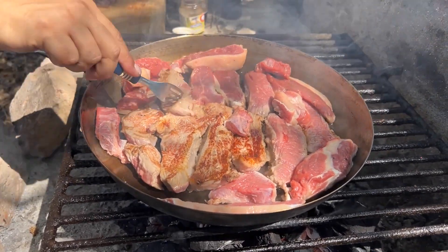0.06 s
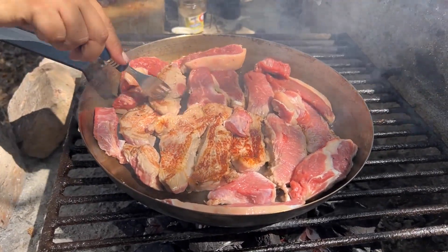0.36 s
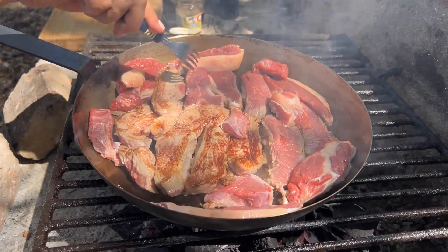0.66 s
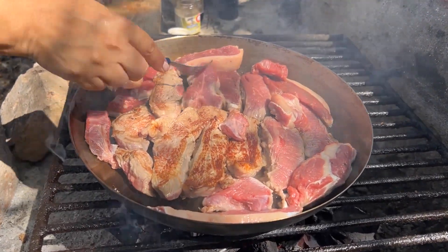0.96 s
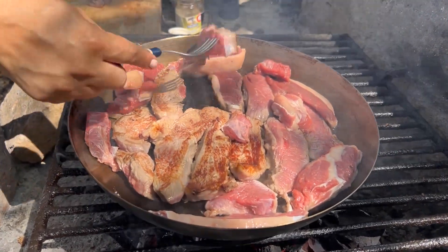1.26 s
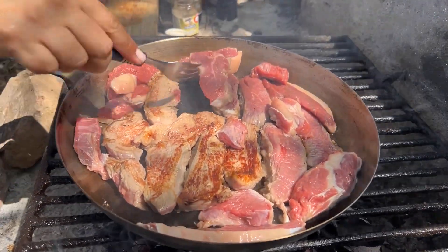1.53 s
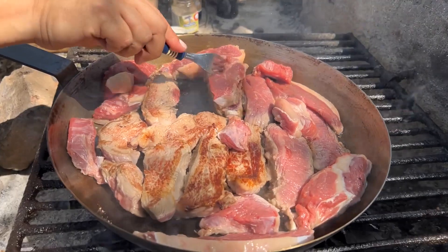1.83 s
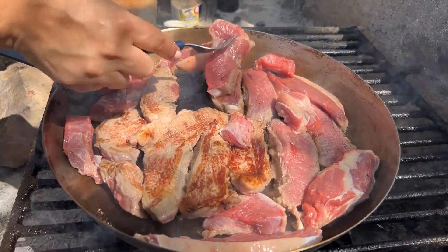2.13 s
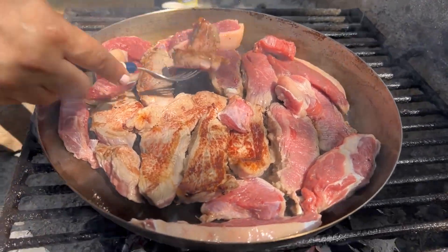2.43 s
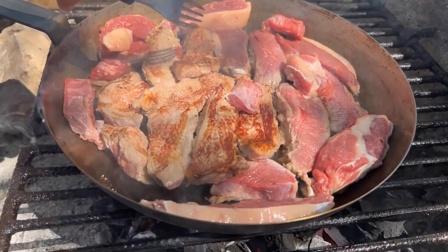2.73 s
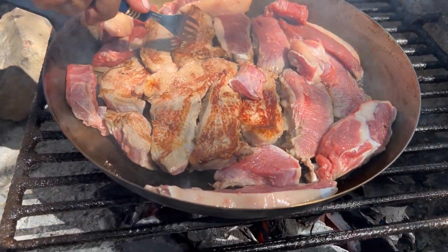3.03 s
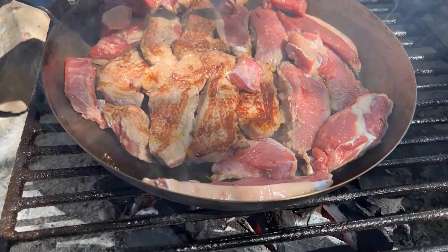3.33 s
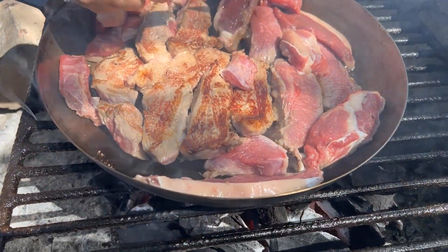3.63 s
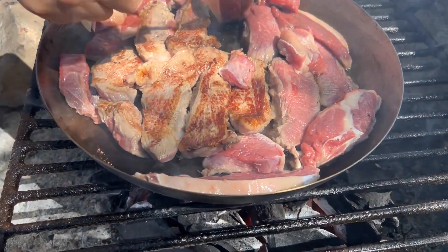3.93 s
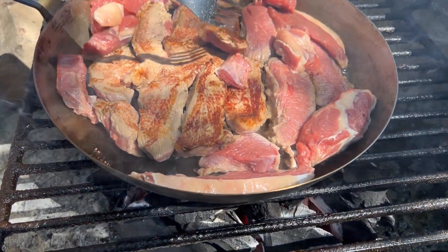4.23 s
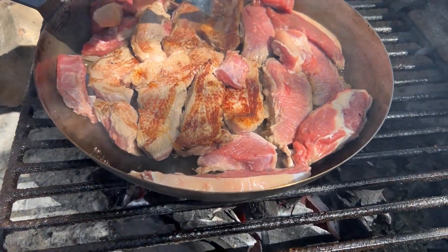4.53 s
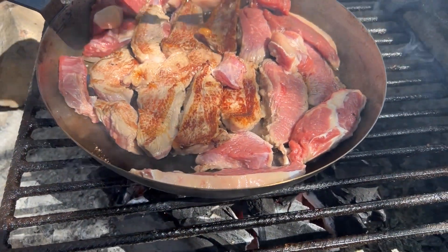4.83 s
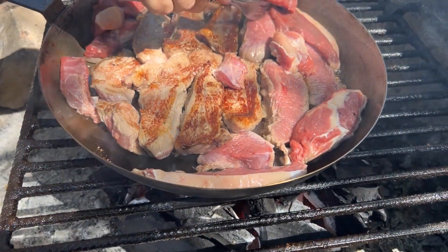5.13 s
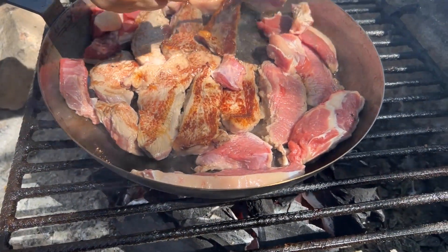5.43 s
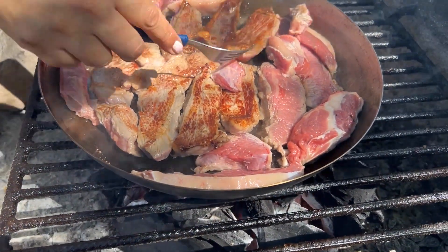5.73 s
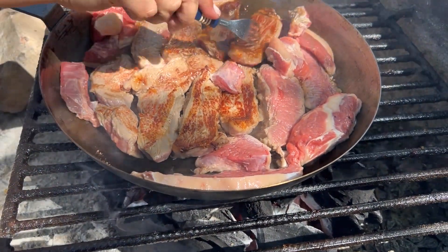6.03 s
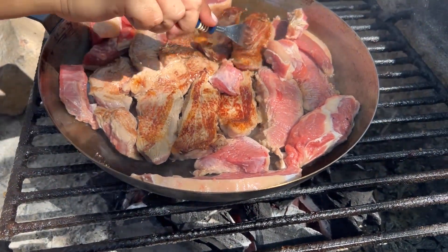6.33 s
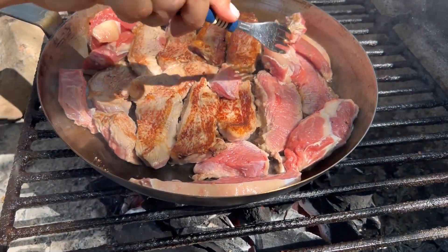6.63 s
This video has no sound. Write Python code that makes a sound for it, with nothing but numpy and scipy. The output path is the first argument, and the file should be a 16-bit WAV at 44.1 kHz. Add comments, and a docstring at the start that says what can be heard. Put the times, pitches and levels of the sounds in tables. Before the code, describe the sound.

Heard close up and in stereo, meat sizzles in an oiled metal pan in the open air. The fine fizz and bubbling stay steady from start to finish, while single pops and spits of fat stand out. Now and then the frying flares a little and juice gurgles as pieces are turned and laid down softly. Later a faint low rumble of wind touches the microphones.

```python
"""Thin pieces of meat sizzle in hot oil in a metal pan over charcoal, outdoors, while a fork turns them.
Countless steam bubbles burst, the smaller the higher: large in the juice, smaller in the oil, a fine fizz
under the meat. Single pops, spits, gurgles and ticks stand out as damped oscillations; meat lands softly.
Later a hand forms a resonant hollow over the pan. A light breeze buffets the close pair of microphones."""
import sys
import numpy as np
from scipy import signal
from scipy.fft import rfft, irfft, next_fast_len
from scipy.io import wavfile
from scipy.ndimage import map_coordinates

SR = 44100
rng = np.random.default_rng(int(sys.argv[2]) if len(sys.argv) > 2 else 0)


def dump(signal):
    """Clip the signal to [-1, 1] and save it as 16-bit WAV at the path in sys.argv[1]."""
    limited = np.clip(np.atleast_2d(signal).T, -1, 1)
    pcm = np.round(limited * 32767).astype(np.int16)
    wavfile.write(sys.argv[1], SR, pcm)


N = 294588
FFT_SIZE = next_fast_len(N + 4096)
HZ, TIME = np.fft.rfftfreq(FFT_SIZE, 1 / SR), np.arange(N) / SR
SIDES = np.array([[1], [-1]])  # left, right

# spectra of large, smaller and finest bubbles: (f/Hz, relative level/dB)
JUICE_SPECTRUM = [(300, -34), (410, -21), (520, -10), (660, -6), (930, -7.5), (1250, -4), (1750, 0.5),
                  (2800, -17), (5000, -25)]
OIL_SPECTRUM = [(700, -32.5), (1500, -13), (2100, -1.5), (2700, 1), (4300, -1.5), (5300, -5), (7000, -10.5),
                (12000, -35)]
FIZZ_SPECTRUM = [(2000, -36.5), (4500, -7), (6200, -3), (7100, -1), (8400, 0.5), (11200, -2.5), (14300, -8),
                 (16000, -9.5)]
# how hard the whole pan fries: (t/s, gain/dB)
HEAT = [(0, -1.5), (.6, -.5), (1.6, 1.5), (2.5, 1.24), (4.3, 0), (5.3, 1.1), (6.68, -1)]
# the fork presses or lays meat on hot metal: (t/s, duration/s, oil gain/dB, fizz gain/dB)
FLARES = [(0.252, 0.092, -1.5, 3), (1.935, .28, 1.8, 0.3), (2.7, .03, 4.5, 3.5), (2.98, 0.21, 2.5, 2.2),
          (3.38, .26, .8, 1.5), (3.728, .23, 1.2, 1.5), (3.994, .11, 1, 4), (4.46, .17, 1, 2),
          (4.722, 0.25, -0.5, 1.5), (4.974, 0.16, 0.5, 3), (5.415, .38, 0, 3), (5.55, .044, 0, 5),
          (5.98, .08, 2.3, 3.5), (6.45, 0.13, 0.3, 1.5)]
# a piece is off the metal: (t/s, duration/s, gain/dB)
LULLS = [(.03, 0.17, -1), (2.838, 0.084, -2), (3.93, 0.079, -1.5), (4.234, 0.27, -1), (6.094, 0.046, -2.5)]
# large steam bubbles: (t/s, level/dB, f/Hz, envelope half-width/cycles)
POPS = [(0.1496, -19.5, 1960, 1.25), (.389, -19, 1900, .6), (.5563, -13, 2600, 0.44),
        (0.5753, -8, 4000, 0.49), (.822, -13.5, 2450, .55), (.8788, -6.2, 2500, 0.51),
        (.8857, -15, 2000, 1.1), (1.2302, -6.5, 3700, 0.37), (1.2376, -9, 3150, 0.65),
        (1.2548, -9.5, 2100, 0.38), (1.3375, -14, 3300, 0.73), (1.4157, -12, 1900, .4),
        (1.5045, -14, 2900, 0.71), (2.144, -11.5, 2090, .8), (2.206, -11, 2350, 0.65),
        (2.228, -11, 2900, .5), (2.293, -4.5, 3400, 0.56), (2.319, -7.5, 3100, 0.42),
        (2.3651, -8.5, 2300, 0.37), (3.0147, -10.5, 2350, .56), (3.1418, -14, 2700, 0.3),
        (3.2224, -3.7, 2510, 0.56), (3.43, -14, 2800, 1.2), (3.5547, -13, 3010, .44),
        (3.9001, -18.5, 1400, 0.66), (3.9282, -8, 2800, .6), (4.1143, -9.5, 2500, 0.4),
        (4.4331, -11, 1940, .9), (4.9891, -10, 3300, .43), (5.0273, -7, 3700, .5), (5.045, -11, 3200, 0.4),
        (5.135, -9, 3000, .65), (5.476, -11, 3100, .55), (6.1696, -8, 3900, 0.51), (6.487, -18, 1910, 0.64),
        (6.6312, -16.5, 2500, 0.6)]
# spits of fat: (t/s, level/dB)
SPITS = [(1.2302, -7), (1.9702, -15), (2.2068, -5), (2.2319, -7), (2.3186, -4.5), (2.4163, -10),
         (3.076, -5), (3.0909, -10), (3.4116, -3), (4.835, -10), (6.4061, -3)]
# juice escapes under a pressed piece: (t/s, duration/s, bubble level/dB, f/Hz, scatter/octaves)
GURGLES = [(1.018, 0.39, -21.5, 2680, 0.28), (1.901, .4, -18.5, 2560, 0.26), (3.009, .13, -17, 2380, .34),
           (3.642, .024, -18, 1530, .1), (3.667, .085, -24.5, 1480, .1), (5.319, .07, -24.5, 1350, .2)]
# meat and fork land on the pan: (t/s, level/dB, f/Hz)
THUDS = [(1.371, -45, 150), (1.776, -42, 166), (2.422, -40, 80), (3.458, -41, 159), (6.565, -45, 170)]
# puffs of breeze: (t/s, duration/s, level/dB)
PUFFS = [(3.683, .42, -56), (4.564, 0.11, -45.5), (4.68, .07, -48), (5.18, .13, -44), (5.286, 0.23, -47.5),
         (5.57, .12, -43.5), (5.907, 0.062, -49), (5.697, 1.3, -51)]
# spectra of the puffs and of the steady outdoor air: (f/Hz, relative level/dB)
PUFF_SPECTRUM = [(18, -30), (45, -2.5), (58, 1), (80, -4.5), (200, -29), (500, -70)]
AIR_SPECTRUM = [(25, -19), (60, -2.5), (110, -4.5), (180, -1), (280, -3), (385, -9.5), (3000, -47)]
# hand and lifted piece form a hollow over the pan: (t/s, share of the sound passing through it)
HAND_COVER = [(5.25, 0.58), (5.9, 0.55)]
# response of that hollow: (f/Hz, gain/dB)
HOLLOW_RESPONSE = [(900, 0), (1300, -2), (1800, -0.5), (2200, -1.5), (2500, -0.5), (3400, 0.5), (4250, 3.5),
                   (5300, -2), (6300, 3), (7050, -2.5), (7800, 1.5), (8600, 2.5), (9400, -9.5), (11500, -2)]
# likeness of the sizzle at the two microphones: (f/Hz, coherence)
COHERENCE = [(50, .8), (170, .95), (350, .7), (550, .96), (1900, .84), (2500, .75), (5500, .62),
             (7200, .68), (8400, .87), (16000, .85)]
# shading by their housing: (f/Hz, left minus right level/dB)
BALANCE = [(400, -0.5), (920, 5), (1100, 2), (1600, 2.5), (2100, -0.5), (3000, 3.5), (5300, 4), (6250, 1.5),
           (7050, 4.5), (8300, -0.3)]
# phase lead of the left microphone: (f/Hz, phase/rad)
PHASE_LEAD = [(1900, .1), (2600, 1.45), (3300, 1.35), (4100, .5), (6200, .1), (7500, .85), (8500, 0),
              (15700, -4 * np.pi)]
# round trip from the hand-held microphones to the pan and back: (t/s, delay/ms)
ECHO_DELAY = [(0, 3.1), (.9, 2.85), (2, 2.58), (3, 2.45), (3.7, 2.5), (5.2, 2.48), (6.1, 2.56),
              (6.68, 2.51)]


def sizzle(juice_db=-36, oil_db=-28.5, fizz_db=-26.5, juice_follows=0.66, flicker_db=0.48):
    """Boiling grows with heat flow: three sizes of bubble swell with each flare and ebb with each lull."""
    juice = bubbles(JUICE_SPECTRUM, 650, 2600, per_s=1100, spread_db=3.5,
                    wash=1.0, sputter_db=1.26, octaves=1.0)
    oil = bubbles(OIL_SPECTRUM, 1920, 5500, per_s=2700, spread_db=3.0,
                  wash=0.76, sputter_db=.5, octaves=0.61)
    fizz = bubbles(FIZZ_SPECTRUM, 4350, 12800, per_s=5500, spread_db=3.5,
                   wash=1.0, sputter_db=.5, octaves=0.31)
    heat_db = curve(TIME, HEAT) + sum(db * flare(s, length) for s, length, db in LULLS)
    oil_swell = heat_db + sum(db * flare(s, length) for s, length, db, _ in FLARES)
    fizz_swell = heat_db + sum(db * flare(s, length) for s, length, _, db in FLARES)
    juice *= amp(juice_db + juice_follows * oil_swell)
    oil *= amp(oil_db + oil_swell)
    fizz *= amp(fizz_db + fizz_swell)
    return (juice + oil + fizz) * amp(flicker_db * wander(14.5))


def bubbles(spectrum, low_hz, high_hz, per_s, spread_db, wash, sputter_db, octaves, count=6):
    """Shot noise: two streams of band-limited bursts over a wash of bursts too small to tell apart."""
    pitches = np.geomspace(low_hz, high_hz, count)
    bands = np.exp(-.5 * (np.log2(np.clip(HZ, low_hz, high_hz) / pitches[:, None]) / octaves) ** 2)
    bands /= np.linalg.norm(bands, axis=0)
    bursts = 0
    for band in bands:
        size = amp(spread_db * np.minimum(rng.exponential(1, (2, N)), 4.5))
        clicks = size * rng.choice([-1, 1], (2, N)) * (rng.random((2, N)) < per_s / count / SR)
        bursts = bursts + band * rfft(unit_rms(clicks), FFT_SIZE)
    streams = waveform(bursts) + wash * rng.standard_normal((2, N))
    steam_flurries = amp(sputter_db * wander(66))
    return unit_rms(colour(streams, spectrum) * steam_flurries)


def flare(s, length, attack_s=0.058, release_s=0.029):
    """Steam output shifts quickly, holds while meat is pressed or lifted, then relaxes exponentially."""
    attack = np.clip((TIME - s) / attack_s, 0, 1)
    return attack * np.exp(-np.maximum(TIME - s - length, 0) / release_s)


def pops(gain_db=2.0, rattle_db=-28, rattle_s=0.0032):
    """A large bursting bubble radiates a pressure pulse, which reverberates between meat and rim."""
    out, t = np.zeros(N), np.arange(-400, 800) / SR
    for s, db, hz, cycles in POPS + stray_pops():
        pulse = -np.cos(2 * np.pi * hz * t) * np.exp(-(hz * t / cycles) ** 2)
        scattered = unit_rms(np.convolve(rng.standard_normal(len(t)), pulse, "same"))
        rattle = scattered * np.exp(-abs(t) / rattle_s) * (t > 0)
        add(out, s + t[0], amp(db + gain_db) * (pulse + amp(rattle_db) * rattle))
    return out


def stray_pops(per_s=8, db=-20.5, spread_db=3, hz=2800, octaves=0.15, cycles=0.51):
    """Lesser pops form a Poisson process, scattered in size and pitch; rows as in POPS."""
    chance, size, pitch = rng.random(N), rng.standard_normal(N), rng.standard_normal(N)
    return [(TIME[i], db + spread_db * size[i], hz * 2 ** (octaves * pitch[i]), cycles)
            for i in np.flatnonzero(chance < per_s / SR)]


def spits(gain_db=2.0, hz=8400, cycles=2.4, spray=0.38, decay_s=.0008):
    """Flash evaporation of a droplet in the fat gives a bright, heavily damped ring and a dash of spray."""
    out, crack = np.zeros(N), bubble_ring(hz, cycles)
    for s, db in SPITS + stray_spits():
        mist = spray * rng.choice([-1, 1], len(crack)) * np.exp(-TIME[:len(crack)] / decay_s)
        add(out, s, amp(db + gain_db) * (crack + mist))
    return without_bass(out, edge_hz=4300)


def stray_spits(per_s=7, db=-17, spread_db=3.0):
    """Weaker spits form a Poisson process; rows as in SPITS."""
    chance, size = rng.random(N), rng.standard_normal(N)
    return [(TIME[i], db + spread_db * size[i]) for i in np.flatnonzero(chance < per_s / SR)]


def gurgles(per_s=220, cycles=2.0, spread_db=2.5, most=400):
    """Pressed meat squeezes out an uneven string of bubbles, their resonances scattered about one pitch."""
    out = np.zeros(N)
    for s, length, db, hz, octaves in GURGLES:
        jitter = rng.random(most)
        size, pitch = rng.standard_normal((2, most)).clip(-2, 2)
        for i in range(min(round(length * per_s), most)):
            ring = bubble_ring(hz * 2 ** (octaves * pitch[i]), cycles)
            add(out, s + (i + jitter[i]) / per_s, amp(db + spread_db * size[i]) * ring)
    return out


def wet_ticks(per_s=70, db=-21.5, spread_db=3.0, hz=3200, octaves=0.558, cycles=2.0,
              clumping=0.63, flare_share=.8):
    """Bubbles in the juice resonate, each with its own damping; they come in clumps and follow flares."""
    out, chance = np.zeros(N), rng.random(N)
    size, pitch, damping = rng.standard_normal((3, N)).clip(-2, 2)
    crowd = np.exp(clumping * wander(15))
    level_db = db + flare_share * sum(rise * flare(s, length) for s, length, rise, _ in FLARES)
    for i in np.flatnonzero(chance < per_s * crowd / crowd.mean() / SR):
        ring = bubble_ring(hz * 2 ** (octaves * pitch[i]), cycles * 2 ** (-.5 * damping[i]))
        add(out, TIME[i], amp(level_db[i] + spread_db * size[i]) * ring)
    return out


def bubble_ring(hz, cycles):
    """A bubble is a damped oscillator: the gas is its spring, the surrounding liquid its mass."""
    turns = hz * np.arange(800) / SR
    return np.sin(2 * np.pi * turns) * np.exp(-turns / cycles) * (1 - np.exp(-2 * turns))


def without_bass(x, edge_hz):
    """A source much smaller than the wavelength radiates poorly, so bubbles lack bass."""
    return signal.sosfilt(signal.butter(4, edge_hz, "high", fs=SR, output="sos"), x)


def thuds(attack_s=0.00055, decay_s=0.01, slap_hz=600):
    """A soft impact excites mainly low frequencies: a quickly damped tone of the pan and a dull slap."""
    out, t = np.zeros(N), np.arange(SR // 10) / SR
    envelope = np.exp(-t / decay_s) * (1 - np.exp(-t / attack_s))
    for s, db, hz in THUDS:
        slap = unit_rms(signal.lfilter(*signal.butter(2, slap_hz, fs=SR), rng.standard_normal(len(t))))
        add(out, s, amp(db) * (np.sin(2 * np.pi * hz * t) + slap) * envelope)
    return out


def outdoors(air_db=-55.5, flutter_db=0.8):
    """Turbulence buffets the microphones in soft, fluttering puffs over a low, steady background."""
    air = amp(air_db) * unit_rms(colour(rng.standard_normal((2, N)), AIR_SPECTRUM))
    turbulence = colour(rng.standard_normal((2, N)), PUFF_SPECTRUM)
    wind = unit_rms(turbulence * amp(flutter_db * wander(22)))
    puffs = sum(amp(db) * np.sin(np.pi * np.clip((TIME - s) / length, 0, 1)) for s, length, db in PUFFS)
    return air + wind * puffs


def microphones(spread, centre):
    """An extended source reaches the pair partly coherent; the housing shades and delays by frequency."""
    coherence = np.clip(on_bins(COHERENCE), 0, 1)
    common, apart = rfft(spread, FFT_SIZE) * np.sqrt([(1 + coherence) / 2, (1 - coherence) / 2])
    common = common + rfft(centre, FFT_SIZE)
    shade = amp(SIDES * on_bins(BALANCE) / 2)
    shade /= np.sqrt(np.mean(shade ** 2, axis=0))
    phase_shift = np.exp(.5j * SIDES * curve(HZ, PHASE_LEAD))
    return waveform((common + SIDES * apart) * phase_shift * shade)


def under_hand(pair, reach_s=3.9, skew_hz=2500, skew_width_hz=450, lead_rad=1.85):
    """Cavity resonance colours the sound as the hand moves in; in one band left and right slip in phase."""
    share = curve(TIME, [(reach_s, 0)] + HAND_COVER)
    lead = lead_rad * np.exp(-((HZ - skew_hz) / skew_width_hz) ** 2)
    hollow = waveform(rfft(pair, FFT_SIZE) * amp(on_bins(HOLLOW_RESPONSE)) * np.exp(.5j * SIDES * lead))
    return (1 - share) * pair + share * hollow


def pan_echo(pair, echo_db=-19.5, falloff=9.3):
    """Interference with an echo off the pan: a faint comb slides and deepens as the microphones near it."""
    delay_s = curve(TIME, ECHO_DELAY) / 1000
    echo = np.array([map_coordinates(side, [(TIME - delay_s) * SR], order=3) for side in pair])
    return pair - amp(echo_db) * (delay_s.min() / delay_s) ** falloff * echo


def amp(db):
    """Decibels to amplitude ratio."""
    return 10 ** (np.asarray(db) / 20)


def unit_rms(x):
    """Scales to an rms of one."""
    return x / np.sqrt(np.mean(x ** 2) + 1e-20)


def curve(axis, points):
    """Linear interpolation of a two-column table."""
    return np.interp(axis, *np.transpose(points))


def on_bins(points):
    """Interpolates a (f/Hz, value) table onto every bin, on a log frequency axis."""
    hz, value = np.transpose(points)
    return np.interp(np.log(HZ + 1), np.log(hz + 1), value)


def waveform(bins):
    """Inverse Fourier transform, cut to N samples."""
    return irfft(bins, FFT_SIZE)[..., :N]


def colour(x, spectrum):
    """Filters by a (f/Hz, level/dB) table."""
    return waveform(rfft(x, FFT_SIZE) * amp(on_bins(spectrum)))


def wander(cutoff_hz):
    """Low-passed noise: a smooth drift of unit rms."""
    return unit_rms(waveform(rfft(rng.standard_normal(FFT_SIZE)) / (1 + (HZ / cutoff_hz) ** 4)))


def add(mix, s, sound):
    """Superposes a sound on the mix from time s."""
    part = mix[max(round(s * SR), 0):][:len(sound)]
    part += sound[:len(part)]


def scene():
    """Extended and compact sources superpose at the microphones, coloured by the hand and the echo."""
    single_bubbles = without_bass(pops() + gurgles() + wet_ticks(), edge_hz=560)
    spread = sizzle() + outdoors()
    centre = spits() + thuds() + single_bubbles
    return pan_echo(under_hand(microphones(spread, centre)))


def record(dry):
    """Band limiting: a steep low-pass removes the highest treble."""
    low_pass = signal.firwin(511, cutoff=15750, window=("kaiser", 9), fs=SR)
    return signal.oaconvolve(dry, low_pass[None], "same")


dry = scene()
out = record(dry)
dump(out)
```